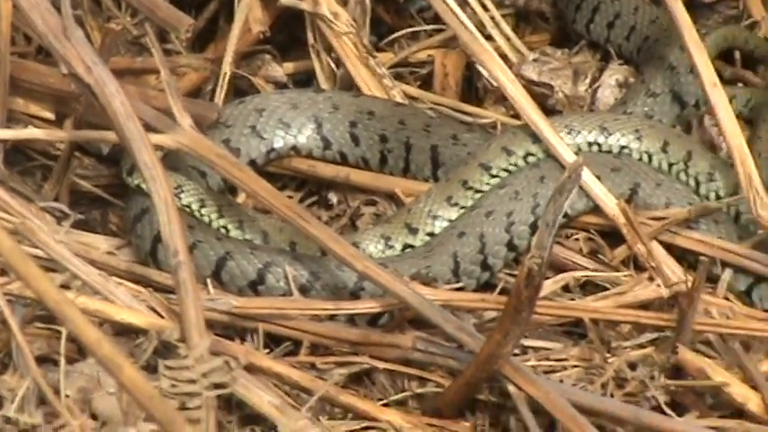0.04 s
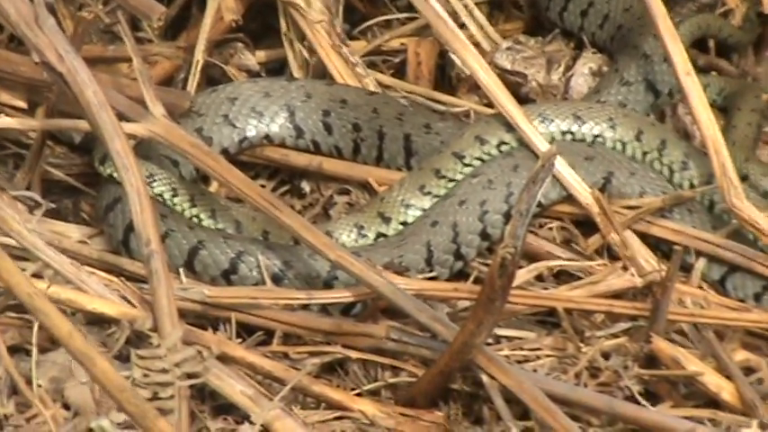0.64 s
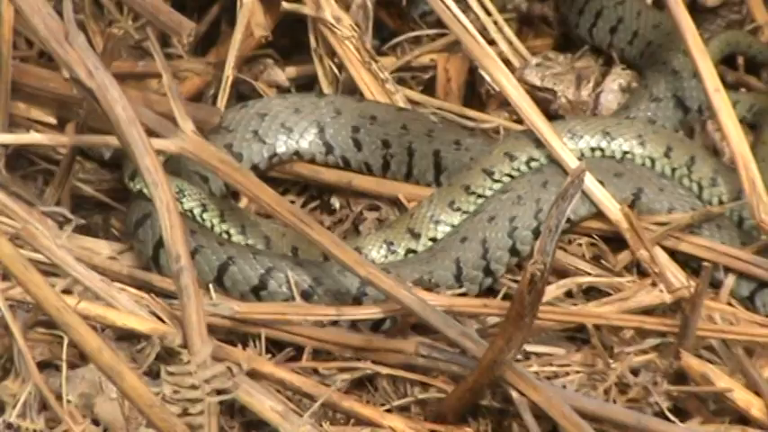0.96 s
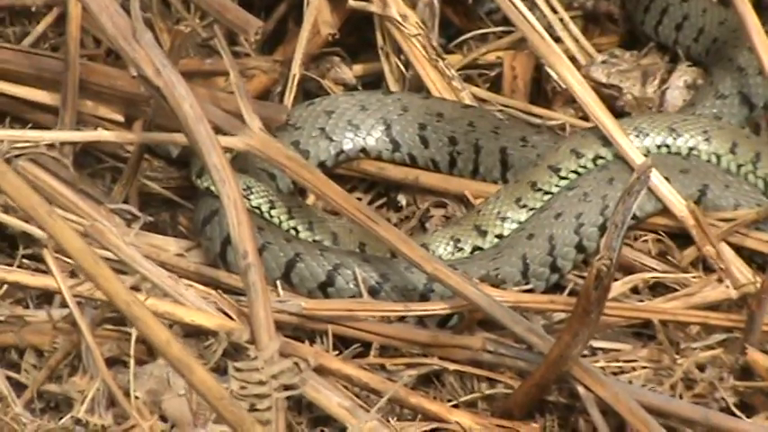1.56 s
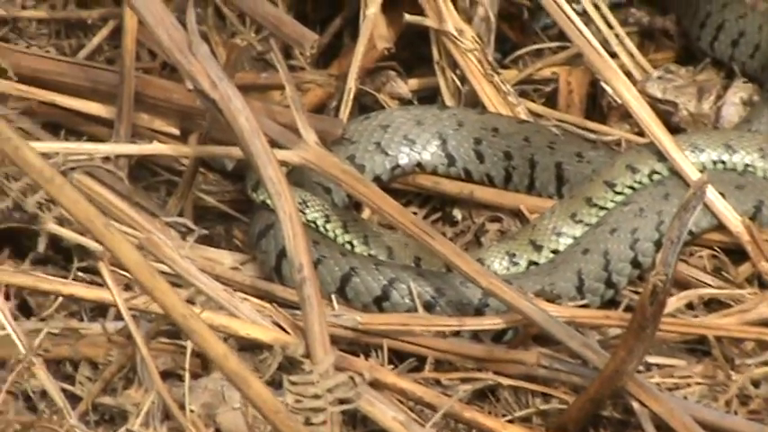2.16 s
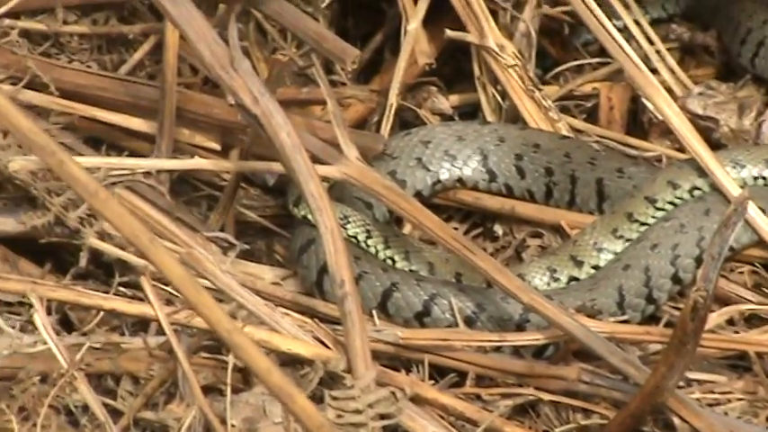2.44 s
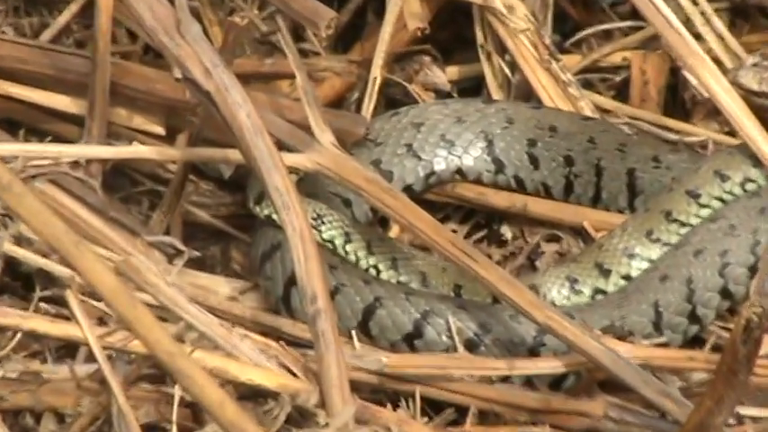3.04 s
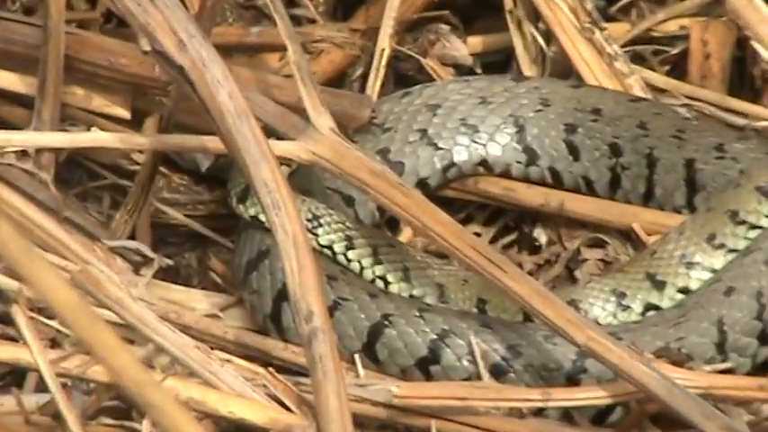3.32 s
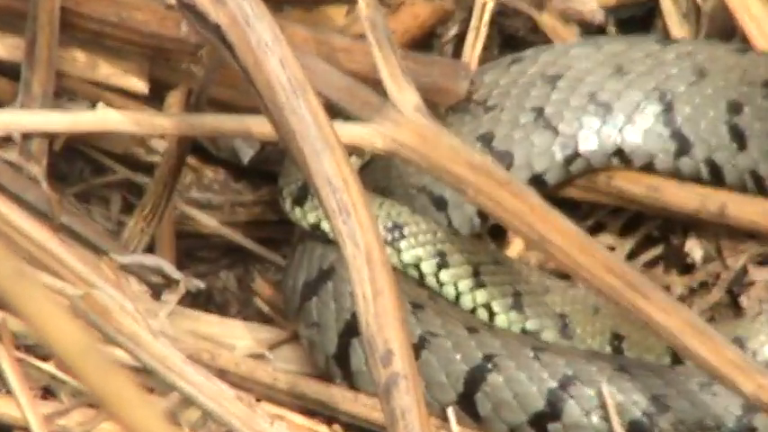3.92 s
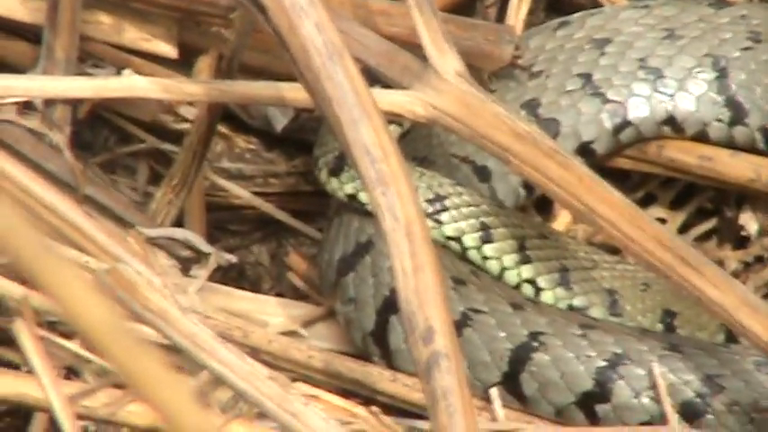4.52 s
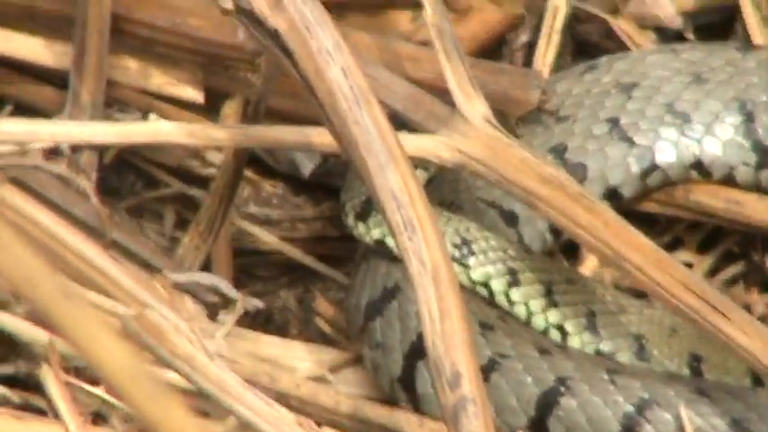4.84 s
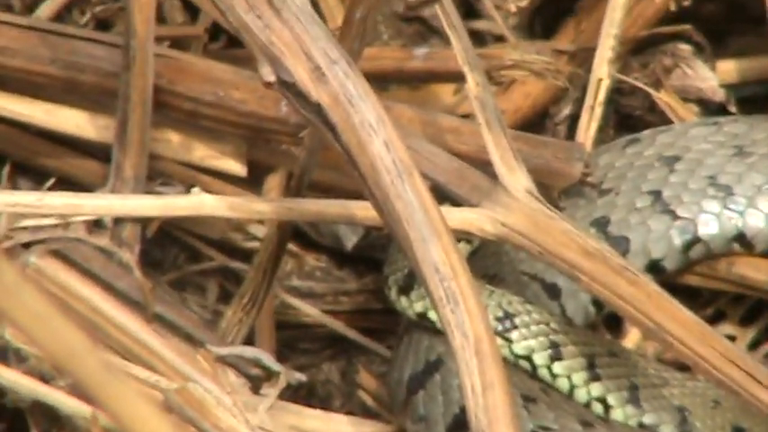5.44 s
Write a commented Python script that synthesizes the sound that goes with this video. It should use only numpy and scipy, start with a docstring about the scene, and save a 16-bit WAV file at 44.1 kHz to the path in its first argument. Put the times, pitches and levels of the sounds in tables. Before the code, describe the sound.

Low wind rumbles on a hand-held microphone outdoors among dry grass, over soft distant air and a faint hiss. The wind builds quickly into its strongest gust from about 0.4 to 0.9 seconds, fluttering with soft low thumps. Far off, a bird gives a string of faint yelping notes that fade by 1.7 seconds, and a few tiny dry ticks sound. After a lull, a second gust buffets the microphone from 2.5 to 3 seconds, with a light handling knock at 2.7 and a few brief distant chirps. The wind nearly drops away around 3.5 seconds, when a small bird begins a very faint run of quick repeated notes lasting about a second. Thin high calls follow until about 5.2 seconds. Short puffs of wind return from 4.2 seconds, growing stronger near 5.4, with single dry ticks around 3.7 and 5.4 seconds.

```python
"""Wind on a microphone in dry grass.

Gusts rumble on a hand-held camera as turbulent eddies buffet its two microphone ports.
Short dry ticks sound, the hand knocks the housing into brief resonance, and small birds call far off,
their gliding tones scattered by the grass. Under it lie distant air, hiss, a faint high fizz
and the thin whine of the camera's motor."""
import sys
import numpy as np
from scipy import signal
from scipy.fft import rfft, irfft
from scipy.io import wavfile
from scipy.ndimage import uniform_filter1d

SR = 44100
rng = np.random.default_rng(int(sys.argv[2]) if len(sys.argv) > 2 else 0)


def wrap_up_sound(samples):
    """Save the sound to the file named by the first command line argument, as 16-bit audio."""
    columns = np.atleast_2d(samples).T
    # keep every value between -1 and 1, then stretch to whole-number steps
    tamed = np.clip(columns, -1, 1)
    steps = np.round(tamed * 32767).astype(np.int16)
    wavfile.write(sys.argv[1], SR, steps)


N = 246078
T = np.arange(N) / SR
HZ = np.fft.rfftfreq(N, 1 / SR)

# left-right likeness of the steady noise; the highest treble is nearly the same on both sides: (frequency [Hz],
# correlation [-1..1])
NOISE_CORRELATION = [(50, 0.86), (200, 0.93), (600, 0.35), (1400, 0.27), (3200, 0.35), (7000, 0.52),
                     (10500, 0.12), (11500, 0.92), (16000, 1)]
FIZZ_STOP_S, FIZZ_RETURN_S = 3.77, 4.87


def amp(db):
    """Decibels to amplitude ratio."""
    return 10 ** (np.asarray(db) / 20)


def unit(x):
    """Normalisation to rms 1."""
    return x / np.sqrt(np.mean(x ** 2) + 1e-20)


def read(points, hz):
    """Interpolation of a spectrum on a log-frequency axis."""
    f, value = np.transpose(points)
    return np.interp(np.log(hz + 1), np.log(f), value)


def follow(rows, t=T):
    """Linear interpolation of a table's columns in time."""
    s, *columns = np.transpose(rows)
    return [np.interp(t, s, c) for c in columns]


def pan(db):
    """Stereo gains for a level difference, left minus right."""
    return amp(np.array([[.5], [-.5]]) * db)


def add(mix, s, sound):
    """Superposition of a sound on the mix at time s."""
    part = mix[:, max(round(s * SR), 0):][:, :sound.shape[-1]]
    part += sound[..., :part.shape[1]]


def drift(hz):
    """Low-pass random fluctuation, rms 1."""
    return unit(irfft(rfft(rng.standard_normal(N)) / (1 + (HZ / hz) ** 4), N))


def noise_pair(correlation):
    """Spectra of two partly correlated white noises."""
    a, b = rfft(rng.standard_normal((2, N)))
    return np.array([a, correlation * a + np.sqrt(1 - correlation ** 2) * b])


def dip(depth_db, recover_s, start_s=0.784, fall_s=0.016):
    """A quick drop in level with exponential recovery, in dB."""
    elapsed = np.maximum(T - start_s, 0)
    return -depth_db * np.minimum(elapsed / fall_s, 1) * np.exp(-elapsed / recover_s)


def bow(length):
    """A parabola: 1 at both ends of a note, 0 in its middle."""
    return np.linspace(-1, 1, round(length * SR)) ** 2


def raspy_phase(hz, rasp):
    """Phase as the integral of frequency; rasp is random frequency modulation."""
    shake = unit(uniform_filter1d(rng.standard_normal(len(hz)), size=90))
    return 2 * np.pi * np.cumsum(hz * (1 + .045 * rasp * shake)) / SR


def note(hz, db, rasp):
    """A tapered tone along a pitch curve; rasp modulates both amplitude and frequency."""
    flutter = unit(uniform_filter1d(rng.standard_normal(len(hz)), size=220))
    envelope = unit(amp(5 * rasp * flutter)) * signal.windows.tukey(len(hz), .3)
    return amp(db) * envelope * np.sin(raspy_phase(hz, rasp))


def scatter(x, t60):
    """Diffuse reverberation: convolution with decaying noise, different on each side."""
    tail = rng.standard_normal((2, SR)) * amp(-60 * T[:SR] / t60)
    return signal.fftconvolve(x, tail / np.linalg.norm(tail[0]), axes=1)[:, :N]


def airflow(rise_s=0.023, fall_s=0.014, breeze_pitch=0.99):
    """Breeze and gusts add in power; gives their level in dB and power-weighted pitch factor."""
    # light wind between gusts: (time [s], level [dB])
    breeze = [(0, -47.5), (.3, -43.5), (.55, -34), (.9, -41.5), (1.45, -51.5), (1.8, -52), (1.92, -59),
              (2.05, -52), (2.5, -48.5), (3.1, -52), (3.4, -54), (3.58, -75), (3.8, -49.5), (4.15, -55),
              (4.35, -47.5), (4.85, -42.5), (5.15, -50), (5.58, -42)]
    # gusts on the ports: (arrival [s], hold [s], level [dB], eddy pitch [ratio])
    gusts = [(0.117, 0.073, -42, 1.21), (.38, 0.067, -36, 0.91), (0.497, 0.11, -27.5, .84),
             (0.655, 0.061, -27.5, 1.55), (0.77, 0.14, -40, 1.4), (0.991, 0.12, -41.5, 1.1),
             (1.203, 0.17, -43, 1.08), (1.61, 0.094, -46, 0.96), (2.436, 0.011, -43, 0.79),
             (2.537, 0.017, -37, 1.07), (2.586, 0.255, -31.5, 1.09), (2.839, 0.13, -36.5, 0.98),
             (3.166, 0.14, -47.5, 0.79), (3.7, 0.014, -46.5, 1.3), (3.984, 0.11, -48, 1.2),
             (4.224, 0.017, -34, 1.24), (4.574, 0.048, -35, 1.3), (4.749, 0.037, -36, 1.05),
             (4.873, 0.063, -38.5, 1), (5.235, 0.017, -39.5, 0.98), (5.312, 0.021, -38, 1.13),
             (5.392, 0.021, -32.5, 1), (5.454, 0.057, -32, 1.34)]
    power = amp(follow(breeze)[0]) ** 2
    pitch = breeze_pitch * power
    for s, hold, db, factor in gusts:
        envelope = np.exp(-np.maximum(s - T, 0) / rise_s - np.maximum(T - s - hold, 0) / fall_s)
        gust = (amp(db) * envelope) ** 2
        power, pitch = power + gust, pitch + factor * gust
    return 10 * np.log10(power), pitch / power


def wind(mid_db=-34, flutter_db=3.5, gust_left_db=2.75):
    """Turbulence: faster wind sheds smaller eddies, so the rumble rises and the ports decorrelate."""
    # turbulence at middling wind speed: (frequency [Hz], relative spectral density [dB])
    turbulence = [(12, 0), (28, -9.5), (55, 2), (100, 0.5), (180, -1.5), (280, -15), (450, -25),
                  (800, -42.5), (1600, -61), (4000, -56.5)]
    # large eddies cover both ports, small ones only one: (frequency [Hz], correlation [-1..1])
    port_correlation = [(25, 0.9), (60, 0.69), (125, 0.026), (250, -0.1), (500, -0.7), (1500, 0.52)]
    pressure_db, pitch = airflow()
    pressure_db += 1.5 * drift(hz=16)
    force_db = pressure_db - dip(depth_db=7.5, recover_s=4.2) - mid_db
    speed = amp(force_db) ** 0.25 * pitch
    calm = np.interp(force_db, [-12, 4], [1, 0])
    ports, bursts = noise_pair(0), drift(hz=35)
    octave, out = np.log2(HZ + 1e-3), np.zeros((2, N))
    for centre in 2 ** np.arange(4, 12.5, .5):  # half-octave bands
        window = np.cos(np.pi / 2 * np.clip(2 * (octave - np.log2(centre)), -1, 1))
        left, other = irfft(ports * window, N)
        correlation = np.clip(read(port_correlation, centre) + 0.17 * calm, -.9, .95)
        right = correlation * left + np.sqrt(1 - correlation ** 2) * other
        # the finer the eddies, the more they come in bursts
        burst_db = flutter_db * bursts * np.interp(centre, [150, 600], [1, 1.5])
        out += np.array([left, right]) * amp(read(turbulence, centre / speed) + burst_db)
    power = uniform_filter1d(uniform_filter1d(out.mean(0) ** 2, size=2000), size=2000)
    return out / np.sqrt(abs(power) + 1e-20) * amp(pressure_db) * pan(gust_left_db * (1 - calm))


def distant_air(level_db=-54.5, sway_db=0.88):
    """Low-pitched noise of distant air under slight random amplitude modulation."""
    # (frequency [Hz], relative spectral density [dB])
    spectrum = [(20, -18), (55, 5.5), (110, 1), (250, -6), (700, -4), (1200, -9.5), (2000, -15),
                (3500, -22), (7000, -69), (16000, -67)]
    noise = irfft(noise_pair(read(NOISE_CORRELATION, HZ)) * amp(read(spectrum, HZ)), N)
    return unit(noise) * amp(level_db + sway_db * drift(hz=7.3))


def motor_whine(waver_hz=5, gain_db=5.5):
    """Partials locked to one wavering shaft; close frequencies beat against each other."""
    # motor lines: (frequency [Hz], relative level [dB])
    partials = [(6431, -83), (6477, -87), (6386, -95), (6702, -101), (6212, -99), (5988, -98), (5671, -98),
                (3846, -91), (15625, -97)]
    shaft_time = np.cumsum(1 + waver_hz / partials[0][0] * drift(hz=3.05)) / SR
    whine = sum(amp(db) * np.sin(2 * np.pi * (hz * shaft_time + rng.random())) for hz, db in partials)
    return np.sqrt(2) * amp(gain_db) * whine * pan(-3)


def hiss(level_db=-62, lull_db=-1):
    """Broadband noise, leaning right below its top octave and easing while the fizz is away."""
    # (frequency [Hz], relative spectral density [dB])
    spectrum = [(500, 11.5), (2500, 2), (3500, 1.5), (5500, 3), (7500, 0.5), (9600, -6), (11000, -3.5),
                (12200, 0), (14000, -4), (16400, -5)]
    lean = pan(np.interp(HZ, [6000, 9000], [-3, 0]))
    noise = irfft(noise_pair(read(NOISE_CORRELATION, HZ)) * amp(read(spectrum, HZ)) * lean, N)
    lull = uniform_filter1d(1. * (T > FIZZ_STOP_S) * (T < FIZZ_RETURN_S), size=12000)
    return unit(noise) * amp(level_db + dip(depth_db=6.5, recover_s=4.4) + lull_db * lull)


def fizz(centre_hz=9400, width_hz=1300, level_db=-75, swell_db=4, swell_s=.12, fade_s=0.18):
    """A Gaussian band of treble noise swells, cuts out and fades back in."""
    band = irfft(noise_pair(0.097) * np.exp(-((HZ - centre_hz) / width_hz) ** 2 / 2), N)
    swell = (T < FIZZ_STOP_S) * amp(swell_db * np.exp(-abs(T - FIZZ_STOP_S) / swell_s))
    fade_in = np.clip((T - FIZZ_RETURN_S) / fade_s, 0, 1)
    return unit(band) * (swell + fade_in) * amp(level_db + dip(depth_db=10, recover_s=5))


def yelps(mix):
    """Three harmonics glide over a crest; frequency jitter cracks the voice as it falls."""
    # (crest time [s], pitch [Hz], level [dB], length [ratio], glide depth [ratio],
    #  second-harmonic boost [dB], rasp [0..1])
    calls = [(.16, 1980, -59.5, 1.1, 1.15, 1.5, 0.38), (.487, 1950, -59, 0.94, 0.88, 2, 0.06),
             (.81, 1944, -63, 1, 0.92, -3.5, .4), (1.088, 2283, -72.5, 1.2, 2.8, 10.5, .1),
             (1.33, 1856, -69, 1.4, 0.77, 4.5, 0.96), (1.68, 1742, -73.5, 1.6, .7, 8, 0.9)]
    # one yelp: (time from crest [s], pitch [ratio], harmonic 1 [dB], harmonic 2 [dB], harmonic 3 [dB])
    contour = [(-.095, .91, -10, -30, -30), (-.05, .95, 0, -22, -20), (-.012, .99, 1, -10, -10),
               (0, 1, 0, -1, -12), (.022, .9, -5, 2, -9), (.048, .76, -16, -10, -12)]
    for s, hz, db, stretch, glide, octave_db, rasp in calls:
        t = np.arange(contour[0][0] * stretch, contour[-1][0] * stretch, 1 / SR)
        bend, *levels = follow(contour, t / stretch)
        phase = raspy_phase(hz * bend ** glide, rasp * np.interp(t, [0, .03], [.4, 1]))
        voice = sum(amp(db + level + octave_db * (k == 2)) * np.sin(k * phase)
                    for k, level in enumerate(levels, 1))
        add(mix, s + t[0], voice * signal.windows.tukey(len(t), .15))


def dry_ticks(decay_s=0.0034):
    """Transients of damped, band-limited noise; one is a lens-motor click as the fizz stops."""
    # (time [s], peak level [dB], centre frequency [Hz], left minus right [dB])
    ticks = [(.247, -53, 8000, -2), (.369, -59, 7000, -2), (1.086, -58.5, 6500, -9), (1.128, -57, 9000, -2),
             (1.314, -54.5, 7500, -2), (3.748, -54, 6200, -9), (5.379, -54.5, 5000, 5)]
    out, t = np.zeros((2, N)), np.arange(2048) / SR
    for s, db, hz, left_db in ticks:
        band = signal.butter(2, hz * np.exp([-0.28, 0.28]), "band", fs=SR, output="sos")
        burst = signal.sosfilt(band, rng.standard_normal(len(t)) * np.exp(-t / decay_s))
        add(out, s, amp(db) * pan(left_db) * burst / abs(burst).max())
    return out


def buffets(gain_db=-1, right_lag_s=0.00059):
    """An eddy's low-pressure core crosses a port: sharp suction between two soft shoulders."""
    # (time [s], relative peak level [dB], centre frequency [Hz], cutoff [Hz], left minus right [dB])
    eddies = [(.478, -17, 136, 165, 6), (0.511, -18, 112, 141, 14), (.540, -19, 104, 134, 10),
              (.591, -14.5, 181, 624, -5), (.675, -16.5, 139, 1100, -15), (.725, -14.5, 117, 346, 4),
              (0.791, -14.5, 234, 840, 4), (0.7979, -14, 190, 2330, 10.5), (1.857, -32, 73.5, 153, 15),
              (2.605, -23.5, 222, 1010, 12), (2.737, -18.5, 200, 480, 4), (2.789, -21.5, 149, 500, 12),
              (2.813, -19.5, 138, 503, 12), (4.220, -21, 162, 910, 9.5), (4.226, -25.5, 100, 397, 5.5),
              (4.681, -22, 110, 282, 11), (5.322, -22, 175, 260, 4), (5.456, -18.5, 152, 400, 9.5)]
    out, t = np.zeros((2, N)), np.arange(-1024, 1024) / SR
    for s, db, hz, cutoff_hz, left_db in eddies:
        distance = 2 * np.pi * hz * abs(t - np.array([[0], [right_lag_s]]))
        lowpass = signal.butter(2, cutoff_hz, fs=SR, output="sos")
        pulse = signal.sosfilt(lowpass, (distance - 1) * np.exp(-distance))
        add(out, s + t[0], amp(db + gain_db) * pan(left_db) * pulse / abs(pulse).max())
    return out


def whistles(mix):
    """Faint, nearly pure tones of steady pitch from the farther birds."""
    # (time [s], duration [s], pitch [Hz], level [dB])
    calls = [(0.56, 0.043, 2690, -67), (2.26, 0.1, 4370, -74), (2.38, 0.14, 2770, -76),
             (2.39, 0.2, 4090, -82), (3.282, .3, 2300, -78), (3.38, 0.17, 3420, -73.5),
             (4.11, .2, 3290, -76), (4.15, .08, 1483, -69), (4.42, 0.145, 1774, -72),
             (4.785, .2, 3350, -77)]
    for s, length, hz, db in calls:
        add(mix, s, note(np.full(round(length * SR), hz), db, rasp=0.087))


def housing_knocks(contact_s=0.00049):
    """Soft impacts of the hand excite the damped modes of the housing."""
    # (time [s], peak level [dB])
    knocks = [(.670, -70), (.676, -51), (.703, -47), (2.699, -37.5), (2.704, -54)]
    # (frequency [Hz], relative level [dB], 60 dB decay time [s])
    modes = [(850, 6.5, 0.0081), (1475, 12.5, 0.01), (2300, 5.5, 0.007)]
    out, t = np.zeros((2, N)), np.arange(2048) / SR
    ring = sum(amp(db - 60 * t / t60) * np.sin(2 * np.pi * hz * t) for hz, db, t60 in modes)
    ring *= 1 - np.exp(-t / contact_s)
    for s, db in knocks:
        add(out, s, amp(db) * ring / abs(ring).max())
    return out


def chirps(mix, arch=.19):
    """Biphonation: two voices follow one pitch arch at a fixed frequency ratio."""
    # (time [s], duration [s], crest [Hz], level [dB], upper pitch [ratio], upper gain [dB], rasp [0..1])
    calls = [(1.026, 0.0496, 4020, -65.5, 1.5, -14, 0.34), (2.662, .07, 3590, -61.5, 2, -7, 0.24),
             (2.912, 0.086, 3820, -57.5, 1.406, -4.5, 0.63)]
    for s, length, hz, db, ratio, upper_db, rasp in calls:
        pitch = hz * (1 - arch * bow(length))
        add(mix, s, note(pitch, db, rasp) + note(pitch * ratio, db + upper_db, rasp))


def twitters(mix, arch=.095):
    """Strong random modulation makes short arched notes scratchy."""
    # (time [s], duration [s], crest [Hz], level [dB])
    calls = [(2.626, 0.049, 4750, -67.5), (2.701, .05, 3290, -63), (2.724, 0.034, 4860, -67),
             (4.132, 0.073, 2980, -68.5)]
    for s, length, hz, db in calls:
        add(mix, s, note(hz * (1 - arch * bow(length)), db, rasp=0.57))


def song(mix, start_s=3.583, period_s=.116, slowing_s=.003, note_s=.085, trough_hz=4070):
    """A small bird repeats one scooped frequency sweep, slowing, at an uneven, slightly rising level."""
    pitch = trough_hz * (1 + 0.19 * bow(note_s))
    for k, chance in enumerate(rng.standard_normal(9)):
        s = start_s + k * period_s + slowing_s * k ** 2 / 2
        add(mix, s, note(pitch, db=-72.5 + 0.12 * k + 2 * chance, rasp=0.47))


def seeps(mix, drop=0.099):
    """Thin calls on a cubic glide: the frequency holds, then drops."""
    # (time [s], duration [s], starting pitch [Hz], level [dB])
    calls = [(3.925, 0.034, 8350, -75), (4.535, .05, 5400, -79), (4.673, 0.061, 4800, -68.5),
             (4.83, 0.065, 8230, -71.5), (4.978, 0.056, 8230, -70), (5.144, 0.041, 8230, -68.5)]
    for s, length, hz, db in calls:
        progress = np.linspace(0, 1, round(length * SR))
        add(mix, s, note(hz * (1 - drop * progress ** 3), db, rasp=0.26))


def birds(gain_db=-.5, flicker_db=2.5):
    """Multipath propagation: calls arrive directly, scattered by grass and echoed from farther off."""
    direct = np.zeros((2, N))
    for call in (yelps, whistles, chirps, twitters, song, seeps):
        call(direct)
    direct *= amp(gain_db + flicker_db * drift(hz=70))
    grass = amp(-7) * scatter(direct, t60=.08)
    far = amp(-9) * scatter(direct, t60=.7)
    # the middle of the birds' range lingers most
    middle = signal.lfilter(*signal.iirpeak(3550, Q=12, fs=SR), direct)
    lingering = amp(-5) * scatter(middle, t60=0.59)
    return (direct + grass + far + lingering) * pan(-3)


def scene():
    """Superposition of all sources; the steady background drops once, near 0.8 s, and creeps back."""
    rumble = wind()
    air_and_motor = (distant_air() + motor_whine()) * amp(dip(depth_db=8.5, recover_s=3.46))
    return rumble + air_and_motor + hiss() + fizz() + birds() + dry_ticks() + buffets() + housing_knocks()


def record(dry):
    """The recorder's band limit: a linear-phase low-pass filter."""
    lowpass = signal.firwin(511, cutoff=16400, window=("kaiser", 9), fs=SR)
    return signal.oaconvolve(dry, lowpass[None], "same")


dry = scene()
out = record(dry)
wrap_up_sound(out)
```